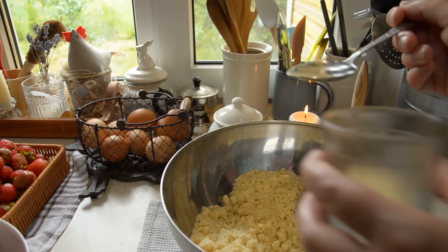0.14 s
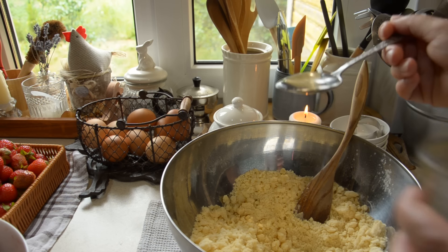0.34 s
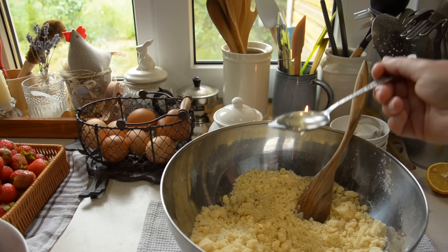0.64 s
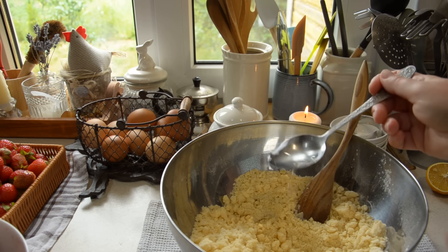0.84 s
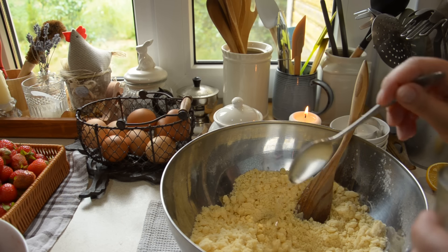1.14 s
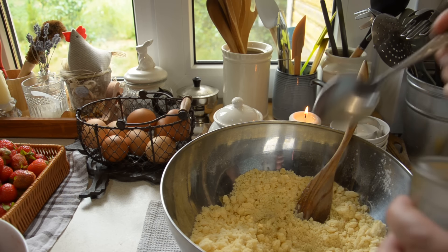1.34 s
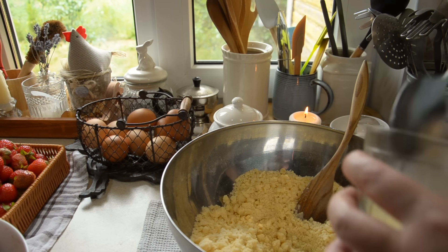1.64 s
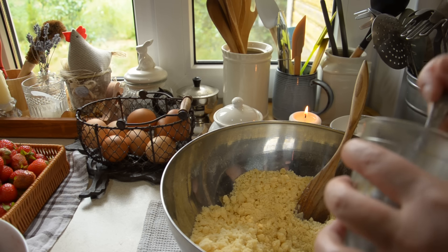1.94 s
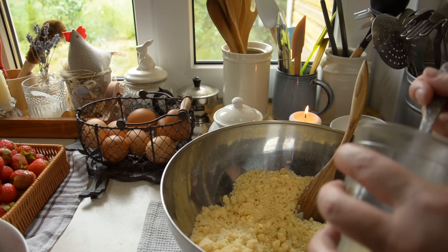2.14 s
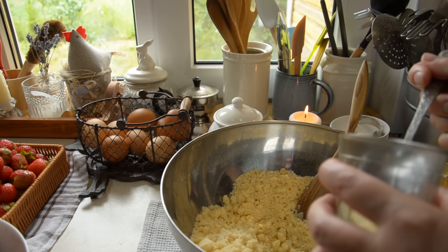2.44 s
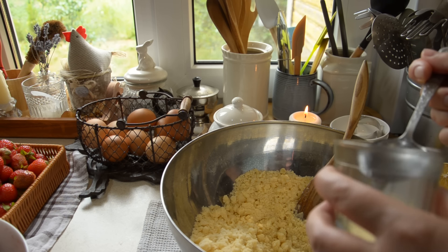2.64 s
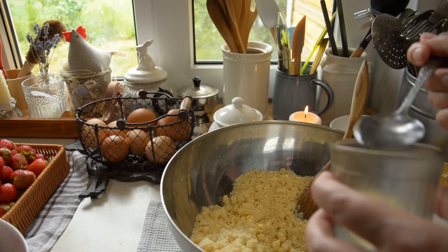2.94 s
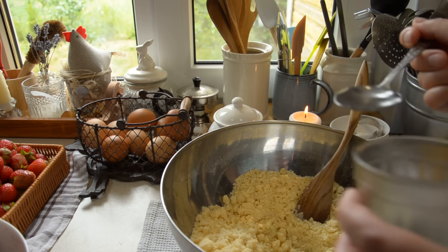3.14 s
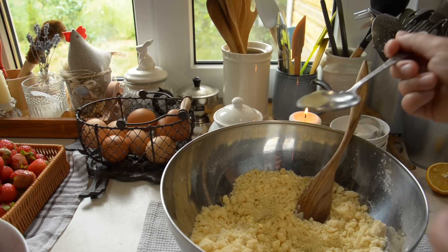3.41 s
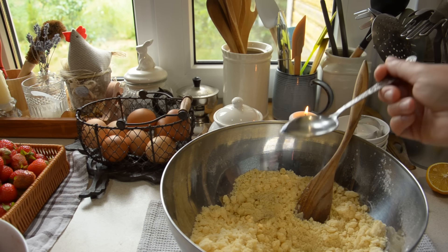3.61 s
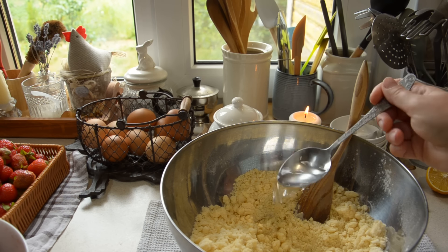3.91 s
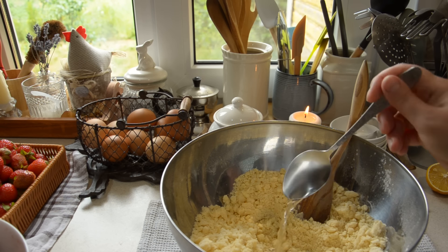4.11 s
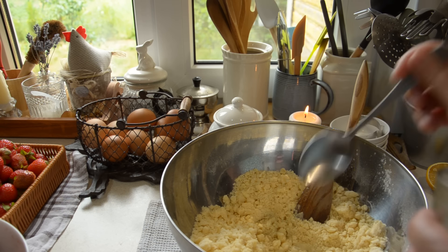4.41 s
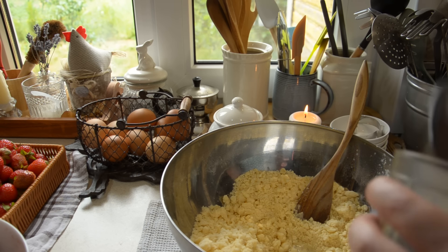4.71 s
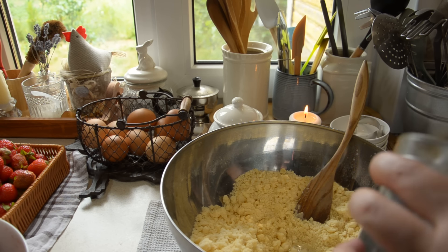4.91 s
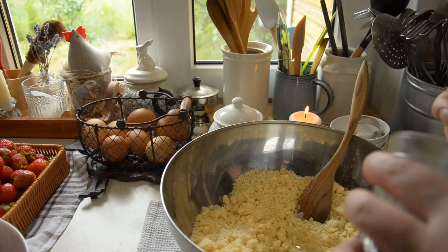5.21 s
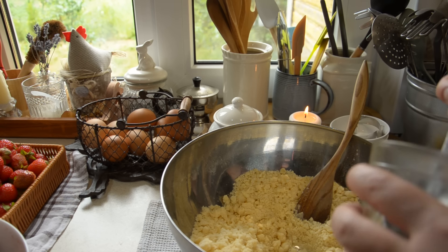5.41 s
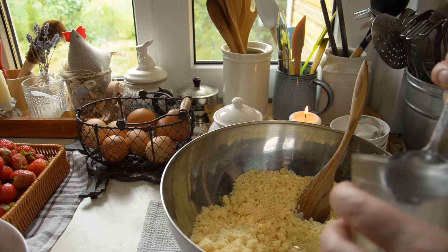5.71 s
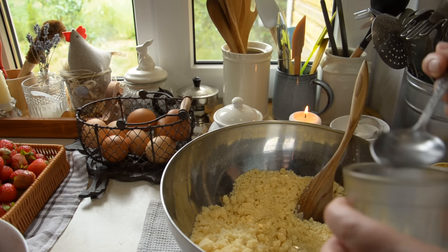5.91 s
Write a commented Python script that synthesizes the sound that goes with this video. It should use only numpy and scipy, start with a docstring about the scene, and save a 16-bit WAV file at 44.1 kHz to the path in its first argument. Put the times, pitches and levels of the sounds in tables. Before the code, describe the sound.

Soft drips over faint room hum; a spoon chinks, squeaks and rubs against a hand-held glass, knocks dully, drips again, then repeats the scoop louder.

```python
"""Over quiet kitchen tone with hum and rustle, drops plip into a bowl of crumbs, as decaying sines.
A metal spoon then clinks on a small hand-held glass jar, as struck modes with a noisy crack.
It scrapes down the glass by stick-slip friction, its pitch sinking as the water loads it, and squeaks.
A few dull knocks of low, damped modes follow this first scoop, then more drops fall in the bowl.
A second scoop brings clinks, soft knocks, a deeper sinking scrape, a squeak and last rubs."""
import sys
import numpy as np
from scipy import signal
from scipy.fft import rfft, irfft
from scipy.io import wavfile
from scipy.ndimage import uniform_filter1d

SR = 44100
rng = np.random.default_rng(int(sys.argv[2]) if len(sys.argv) > 2 else 0)


def put_to_file(sound):
    """Save the sound as 16-bit audio at rate SR, in the file named by the first command-line argument."""
    columns = np.atleast_2d(sound).T  # one column per channel
    safe = np.clip(columns, -1, 1)
    whole_steps = np.round(safe * 32767)
    wavfile.write(sys.argv[1], SR, whole_steps.astype(np.int16))


N = 267246
TIME = np.arange(N) / SR
RING_TIME = TIME[:SR // 2]
PRESSURE_RATE_HZ = 35  # how fast the pressure of the hand wavers


def amp(db):
    """Decibels to gain."""
    return 10 ** (np.asarray(db) / 20)


def evened(x):
    """Scales to an rms of one."""
    return x / np.sqrt(np.mean(x ** 2) + 1e-20)


def steadied(x, size=700):
    """Holds the short-term rms at one and keeps the fast grain."""
    return x / np.sqrt(np.abs(uniform_filter1d(x ** 2, size)) + 1e-20)


def read(points, hz):
    """Reads (Hz, value) points on a log-frequency axis."""
    f, value = np.transpose(points)
    return np.interp(np.log(hz + 1), np.log(f), value)


def coloured(x, points):
    """Filters x by a (Hz, dB) spectrum."""
    gain = amp(read(points, np.fft.rfftfreq(len(x), 1 / SR)))
    return irfft(rfft(x) * gain, len(x))


def wash(spectrum):
    """Steady noise of one colour, at an rms of one."""
    return evened(coloured(rng.standard_normal(N), spectrum))


def high_passed(x, hz, order=2):
    """Removes the bass below hz."""
    return signal.sosfilt(signal.butter(order, hz, "high", fs=SR, output="sos"), x)


def add(mix, s, sound):
    """Mixes a sound in at time s."""
    part = mix[round(s * SR):][:len(sound)]
    part += sound[:len(part)]


def decay(t60):
    """Exponential fall by 60 dB in t60 seconds."""
    return np.exp(-np.log(1000) * RING_TIME / t60)


def ring(hz, db, t60):
    """One struck mode: a decaying sine."""
    return amp(db) * decay(t60) * np.sin(2 * np.pi * hz * RING_TIME)


def burst(spectra, t60, rise_s, low_hz):
    """A short clatter of many dense, quickly damped modes; small objects radiate no bass."""
    noise = evened(coloured(rng.standard_normal(len(RING_TIME)), spectra[0]))
    for spectrum in spectra[1:]:
        noise = coloured(noise, spectrum)
    shape = decay(t60) * (1 - np.exp(-RING_TIME / rise_s))
    return high_passed(noise * shape, low_hz)


def struck(depth, colour, scatter_db, detune):
    """Ring of spoon and jar; the depth of the contact decides which modes wake."""
    # joint modes of spoon and jar: (f/Hz, t60/s, then relative level/dB struck at rim, wall, bottom)
    modes = [(970, 0.11, -39, -18, -29.5), (1173, 0.039, -28, -5, -18), (1140, 0.075, -13, -1.5, -28),
             (1326, 0.032, 5, -6, 0), (1444, 0.046, -2, -21, -10), (1702, 0.096, -21, -29, 4),
             (1770, 0.017, -77, 2, -14), (1906, 0.098, -7, -2, -22.5), (2403, 0.08, 6.5, -14, 0),
             (2950, 0.011, 8.5, 8.5, 4.5), (2957, 0.14, 4.5, -5.5, -14), (3280, 0.025, -64, -26, -3.5),
             (3405, 0.15, -50, -53, -8.5), (3680, 0.079, -50, -22, -20.5), (4108, 0.052, -10.5, -4.5, -24),
             (4250, 0.093, -36, 5.5, -19.5), (5077, 0.079, -19, -12, -29.5), (5490, 0.057, -5, -31, -42),
             (6364, 0.14, -2, -9, -50), (6430, 0.065, -15, 0, -16.5), (6870, 0.061, -38, -11, -3),
             (7390, 0.057, -32, -19, -11.5), (8080, 0.085, -53, -4.5, -19.5), (8900, 0.058, -1, -32, -23),
             (9300, 0.062, -44, 6.5, -41), (9820, 0.12, -31, -35, -21), (10100, 0.095, -23, -19, -55),
             (11320, 0.18, -21, -12.5, -28.5), (13380, 0.15, -22, -23, -41)]
    luck = rng.standard_normal((len(modes), 3))
    out = np.zeros(len(RING_TIME))
    for (hz, t60, *dbs), (shift, size, side) in zip(modes, luck):
        contact_db = np.interp(depth, np.arange(len(dbs)), dbs)
        db = contact_db + read(colour, hz) + scatter_db * size
        out += np.sign(side) * ring(hz * (1 + detune * shift), db, t60)  # random polarity
    return out


def resonate(x, hz, width_hz):
    """A steep resonance that follows the curve hz."""
    turn = np.exp(2j * np.pi * np.cumsum(hz) / SR)
    r = np.exp(-np.pi * width_hz / SR)
    return (turn * signal.lfilter([(1 - r) ** 2], [1, -2 * r, r * r], x / turn)).real


def slips(count, per_s, hiss):
    """Stick-slip friction: uneven tiny blows over a fine hiss."""
    chance, size, fine = rng.random(N), rng.standard_normal(N), rng.standard_normal(N)
    blows = evened(size * (chance < per_s / SR))
    return (blows + hiss * fine)[:count]


def squeal(drive, hz, width_hz, clean):
    """A mode kept going by friction: partly a locked tone, partly the ring of separate slips."""
    tone = evened(np.sin(2 * np.pi * (np.cumsum(hz) / SR + rng.random())))
    grain = steadied(resonate(drive, hz, width_hz))
    return np.sqrt(clean) * tone + np.sqrt(1 - clean) * grain  # clean: power share of the tone


def stroke(length, attack_s, release_db_per_s, size=SR // 4):
    """Time axis and envelope of one stroke: attack, hold until length, release."""
    t = np.arange(round(length * SR) + size) / SR
    return t, np.minimum(t / attack_s, 1) * amp(-release_db_per_s * np.maximum(t - length, 0))


def faded(x, size=260):
    """Eases a stroke in and out."""
    return x * signal.windows.tukey(len(x), 2 * size / len(x))


def wobble(count, rate_hz):
    """Random knots joined by lines, two per cycle of rate_hz, at an rms of one."""
    knots = np.clip(rng.standard_normal(256), -2, 2)
    return evened(np.interp(np.arange(count) / SR * 2 * rate_hz, np.arange(len(knots)), knots))


def room_tone(air_db=-62.8, hum_hz=197.6, hum_db=-76, hum_width_hz=12, whine_hz=15711, whine_db=-90):
    """Dull room noise, a low rustle that comes and goes, a wavering appliance hum and a faint whine."""
    # colour of the room noise: (f/Hz, relative level/dB)
    air = [(15, -44), (25, -16), (59, -5.5), (86, -9), (136, -5.5), (164, -7), (193, -4.5), (409, -3),
           (941, -2.5), (1200, -5.5), (1490, -5), (4020, -19), (6010, -27.5), (14200, -35), (15400, -42)]
    # loudness of the rustle over time: (t/s, level/dB)
    rustle_levels = [(0, -104), (2.4, -69), (3, -72), (3.5, -71.5), (4.7, -67), (5.2, -78), (6.06, -94)]
    # colour of the rustle: (f/Hz, relative level/dB)
    rustle_colour = [(40, -29), (130, -4.5), (190, -15), (260, -2.5), (340, -3.5), (500, -12), (1000, -13),
                     (4000, -40.5)]
    # noise through a narrow resonance wavers by itself
    hum = amp(hum_db) * evened(resonate(rng.standard_normal(N), np.full(N, hum_hz), hum_width_hz))
    whine = amp(whine_db) * np.sin(2 * np.pi * whine_hz * TIME)
    rustle = amp(np.interp(TIME, *np.transpose(rustle_levels))) * wash(rustle_colour)
    return amp(air_db) * wash(air) + rustle + hum + whine


def kitchen(x, near_db=-13, tail_db=-6.0, onset_s=0.002):
    """Quick echoes from the bowl, worktop and window, then the tail of the room."""
    # how long the room rings: (f/Hz, t60/s)
    room_t60 = [(200, 0.4), (1000, 0.44), (2500, 0.32), (7000, 0.42), (14000, 0.21)]
    near = np.zeros(len(RING_TIME))
    near[(SR * rng.uniform(.001, .014, 12)).astype(int)] = rng.choice([-1, 1], 12)
    # tail: noise that decays at its own rate in each band
    hz, t, z = signal.stft(rng.standard_normal(len(RING_TIME)), SR, nperseg=256)
    fall = np.exp(-np.log(1000) * t / read(room_t60, hz)[:, None])
    tail = signal.istft(z * fall, SR, nperseg=256)[1][:len(near)]
    tail = tail * (1 - np.exp(-RING_TIME / onset_s))
    echoes = amp(near_db) * near / np.linalg.norm(near) + amp(tail_db) * tail / np.linalg.norm(tail)
    return x + signal.fftconvolve(x, echoes)[:N]


def drips():
    """Each drop gives a small plip: one decaying mode."""
    # water lands in the bowl: (t/s, f/Hz, relative level/dB, t60/s)
    drops = [(.895, 1600, -43, 0.021), (0.903, 1585, -49, 0.053), (1.052, 10000, -52, .002),
             (1.1925, 1900, -37, 0.0037), (4.063, 1650, -38, 0.0048), (4.071, 1550, -42.5, 0.024),
             (4.081, 1750, -43, 0.014)]
    out = np.zeros(N)
    for s, hz, db, t60 in drops:
        add(out, s, ring(hz, db, t60))
    return out


def knocks(thud_db=-10, thud_t60=0.089, cushion_hz=2500):
    """Soft contacts, cushioned by water and hand, wake only low, damped modes."""
    # dull knocks: (t/s, relative level/dB)
    contacts = [(2.5995, -48), (2.6106, -30.5), (2.632, -35.5), (2.683, -32), (2.7968, -40), (5.0465, -36),
                (5.2704, -44)]
    # modes of each knock: (f/Hz, relative level/dB, t60/s)
    dull_modes = [(410, -23.5, 0.072), (533, -16, 0.11), (719, -11, 0.11), (1008, 0, 0.013),
                  (1470, -23, 0.023)]
    # colour of the noisy thud: (f/Hz, relative level/dB)
    thud_colour = [(50, -36), (150, -42), (450, 5.5), (1300, 4.5), (2200, -20), (6000, -36), (14000, -52)]
    out = np.zeros(N)
    for s, db in contacts:
        thud = amp(thud_db) * burst([thud_colour], thud_t60, rise_s=0.00072, low_hz=253)
        add(out, s, amp(db) * (sum(ring(*mode) for mode in dull_modes) + thud))
    return signal.sosfilt(signal.butter(3, [310, cushion_hz], "band", fs=SR, output="sos"), out)


def rubs(wall_width_hz=55, modes_db=-8, attack_s=0.012, release_db_per_s=200,
         pressure_db=1.55, pressure_bend=0.0061):
    """Sliding on the glass keeps the wall and the deep-contact modes ringing, with a gritty rasp."""
    # spoon rubs along the wall: (t/s, length/s, wall f/Hz, relative ring level/dB, relative grit level/dB)
    slides = [(1.833, 0.021, 2432, -38, -68), (1.883, 0.055, 2490, -57, -72), (1.98, 0.051, 2497, -42, -51),
              (2.046, 0.063, 2460, -51, -49), (2.173, 0.1, 2613, -46, -46),
              (4.939, 0.075, 2470, -42, -50.5), (5.002, 0.014, 2565, -37.5, -60),
              (5.23, 0.069, 2580, -43, -52), (5.376, 0.15, 2620, -56, -54.5),
              (5.532, 0.044, 2573, -45, -51.5), (5.582, 0.028, 2595, -41, -48.5),
              (5.659, 0.014, 2594, -42.5, -51), (5.695, 0.057, 2578, -45, -51)]
    # colour of the rasp: (f/Hz, relative level/dB)
    grit = [(60, -32), (300, -8), (750, 1.5), (1050, 17.5), (1800, -0.5), (2700, 19), (3400, -19),
            (4000, -9), (4900, -15), (5700, -17.5), (6900, -16), (8500, -31), (15000, -32)]
    body_colour = [(1300, 1), (3000, 16), (7000, -7), (11000, 7)]  # (f/Hz, relative level/dB)
    out = np.zeros(N)
    for s, length, wall_hz, ring_db, grit_db in slides:
        t, force = stroke(length, attack_s, release_db_per_s)
        pressure = wobble(len(t), PRESSURE_RATE_HZ)  # the unsteady hand moves level and wall pitch
        drive = slips(count=len(t), per_s=600, hiss=0.54)
        body = struck(2.7, body_colour, scatter_db=4, detune=0.0051)  # past 2 counts as bottom
        deep_ring = steadied(signal.fftconvolve(drive, body)[:len(drive)])
        rasp = steadied(coloured(drive, grit)) + amp(modes_db) * deep_ring
        wall = squeal(drive, wall_hz * (1 + pressure_bend * pressure), wall_width_hz, clean=0.14)
        sound = amp(ring_db) * wall + amp(grit_db) * rasp
        add(out, s, faded(force * amp(pressure_db * pressure) * sound))
    return out


def squeaks(width_hz=140, bend=0.0076, attack_s=0.02, release_db_per_s=306):
    """Friction locks briefly onto the top mode of the wet spoon."""
    # squeak at the end of each drag: (t/s, length/s, f/Hz, relative level/dB)
    locks = [(2.28, 0.029, 2031, -37.5), (5.419, 0.022, 2292, -41.5)]
    out = np.zeros(N)
    for s, length, hz, db in locks:
        t, swell = stroke(length, attack_s, release_db_per_s)
        drive = slips(count=len(t), per_s=650, hiss=0.77)
        pitch = hz * (1 + bend * wobble(len(t), PRESSURE_RATE_HZ))
        add(out, s, amp(db) * swell * squeal(drive, pitch, width_hz, clean=0.69))
    return out


def dips(low_db=-4, middle_db=-5, low_width_hz=150, middle_width_hz=220, chatter_db=-7,
         chatter_width_hz=550, slosh=0.01196, bass_hz=650, clean=.55):
    """The scraping spoon sings; water clinging to its bowl adds mass as it sinks and lowers its modes."""
    # spoon sinks into the water: (t/s, sinking time/s, water mass over spoon mass)
    sinkings = [(2.125, 0.15, 1.6), (5.29, 0.17, 2.85)]
    # sinking spoon catches and jerks forward on the glass: (t/s, relative force/dB)
    jerks = [(2.15, -44), (2.188, -33), (2.226, -40), (2.263, -39), (2.292, -44), (5.316, -40),
             (5.355, -34), (5.405, -37.5), (5.429, -36), (5.451, -47)]
    dry_low_hz, gap_hz = 1890, 447  # lowest mode of the dry spoon; the middle mode lies the gap above
    out, force = np.zeros(N), np.zeros(N)
    for s, db in jerks:
        jerk = stroke(0.0062, attack_s=0.004, release_db_per_s=287)[1]
        add(force, s, amp(db) * jerk)
    t = np.arange(0, 0.4, 1 / SR)
    for s, sink_s, water_mass in sinkings:
        immersion = np.sin(np.pi / 2 * np.minimum(t / sink_s, 1)) ** 2
        loaded_hz = dry_low_hz / np.sqrt(1 + water_mass * immersion)
        low_hz = loaded_hz * (1 + slosh * wobble(len(t), PRESSURE_RATE_HZ))
        middle_hz = low_hz + gap_hz
        drive = slips(count=len(t), per_s=520, hiss=0.79)
        low = amp(low_db) * squeal(drive, low_hz, low_width_hz, clean)
        middle = amp(middle_db) * squeal(drive, middle_hz, middle_width_hz, clean)
        chatter = amp(chatter_db) * steadied(resonate(drive, middle_hz, chatter_width_hz))
        add(out, s, faded(low + middle + chatter))
    return high_passed(force * out, bass_hz, order=3)


def clinks(wall_t60=0.093, crack_db=-4, crack_t60=0.072, bass_hz=330):
    """Each blow rings the wall and the higher modes, with a short crack of hard contact."""
    # spoon strikes glass: (t/s, depth 0 rim - 1 wall - 2 bottom and beyond, wall f/Hz,
    # then relative level/dB of wall ring, low body, hard edge, sparkle)
    strikes = [(1.818, 0, 2428, -27.5, -35.5, -45, -44.5), (1.8235, 0.7, 2432, -25, -46, -40.5, -39.5),
               (1.9658, 1.4, 2460, -27.5, -24.5, -38.5, -38), (2.0366, 2, 2450, -25, -42, -34.5, -35),
               (2.0698, 1.54, 2526, -26.5, -28.5, -35, -27), (2.0717, 1.55, 2529, -21.5, -37, -30, -27.5),
               (2.5994, 2, 2586, -37.5, -41, -46.5, -48.5), (4.9292, 0, 2600, -35.5, -26.5, -43, -37.5),
               (5.0467, 0.6, 2514, -13.5, -14.5, -28.5, -24.5), (5.2449, 1.37, 2590, -59, -38, -32, -40),
               (5.268, 2.3, 2690, -24, -45, -27.5, -32.5), (5.278, 2, 2590, -34, -44, -26.5, -33.5),
               (5.316, 2.2, 2580, -44, -44, -43, -42), (5.656, 2, 2552, -32, -46.5, -48, -49)]
    # colour of the crack: (f/Hz, relative level/dB)
    crack_colour = [(60, -45), (200, -72), (450, -4.5), (750, 4.5), (1200, 13), (2800, 13), (5000, 0.5),
                    (7500, -1), (11000, -5), (15500, -21)]
    out = np.zeros(N)
    for s, depth, wall_hz, wall_db, body_db, edge_db, sparkle_db in strikes:
        colour = [(1300, body_db), (3000, edge_db), (7000, sparkle_db)]
        crack = amp(crack_db) * burst([crack_colour, colour], crack_t60, rise_s=0.00011, low_hz=197)
        wall = ring(wall_hz, wall_db, wall_t60)
        add(out, s, wall + struck(depth, colour, scatter_db=1.5, detune=0.002) + crack)
    return high_passed(out, bass_hz)


def scene():
    """The spoon, the jar and the drips in the room."""
    near_sounds = clinks() + knocks() + dips() + squeaks() + rubs() + drips()
    return (kitchen(near_sounds) * amp(-4.0) + room_tone())[None]


def record(dry, offset=0.00059, edge_hz=15900):
    """A tiny converter offset, then the band limit."""
    low_pass = signal.firwin(511, edge_hz, window=("kaiser", 9), fs=SR)
    return signal.oaconvolve(dry + offset, low_pass[None], "same")


dry = scene()
out = record(dry)
put_to_file(out)
```